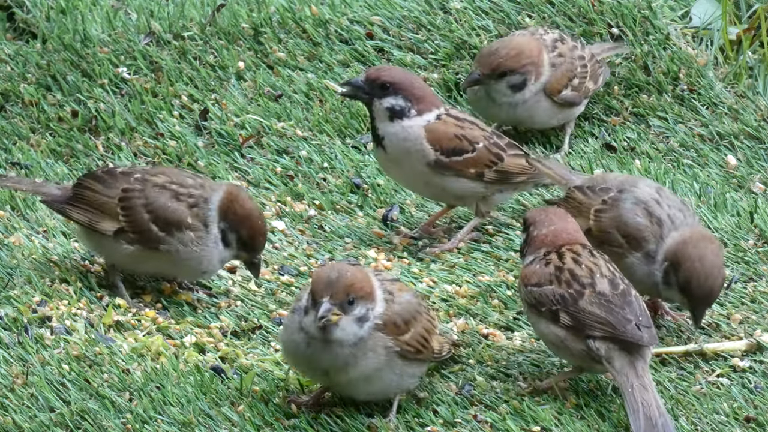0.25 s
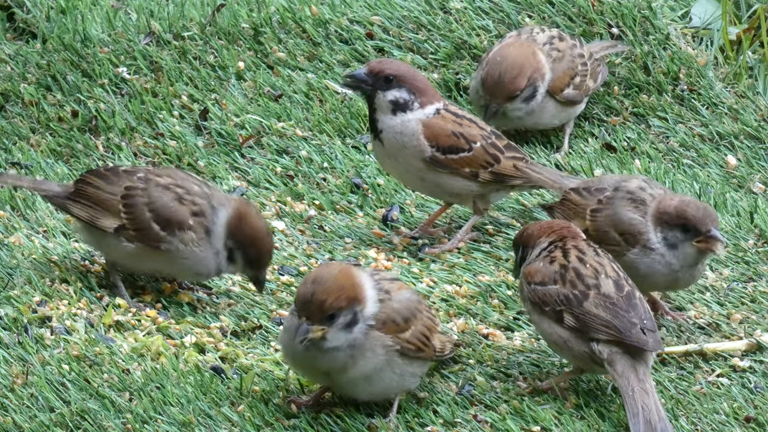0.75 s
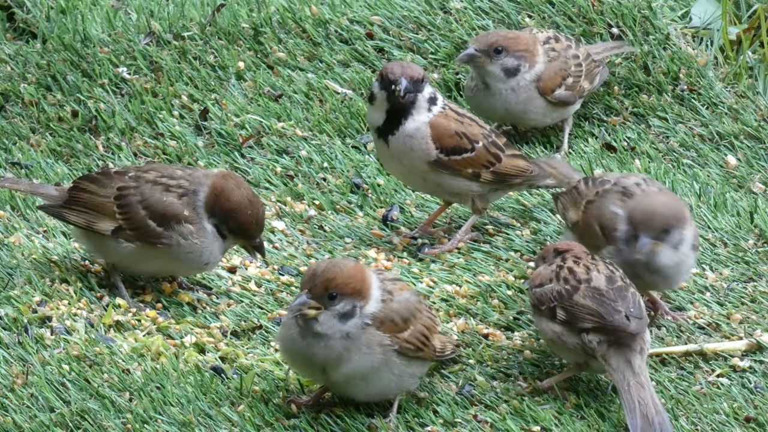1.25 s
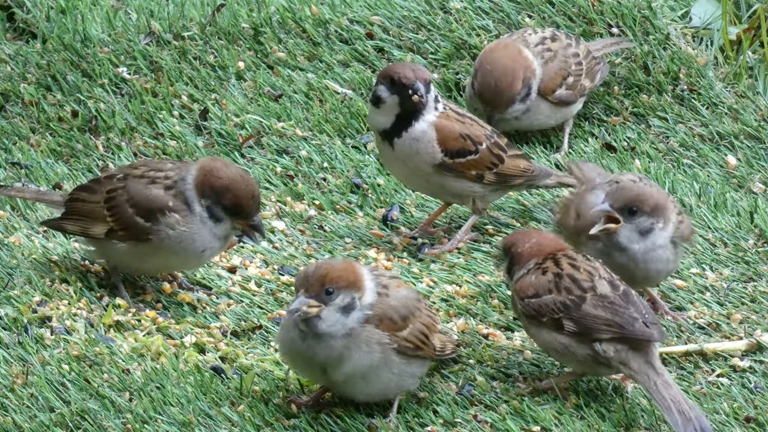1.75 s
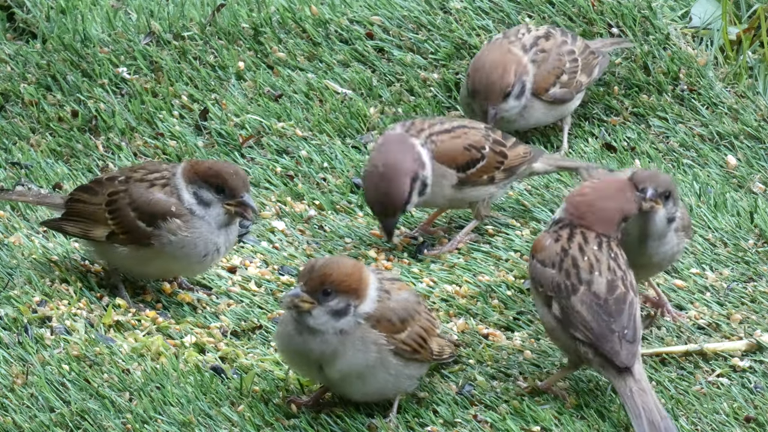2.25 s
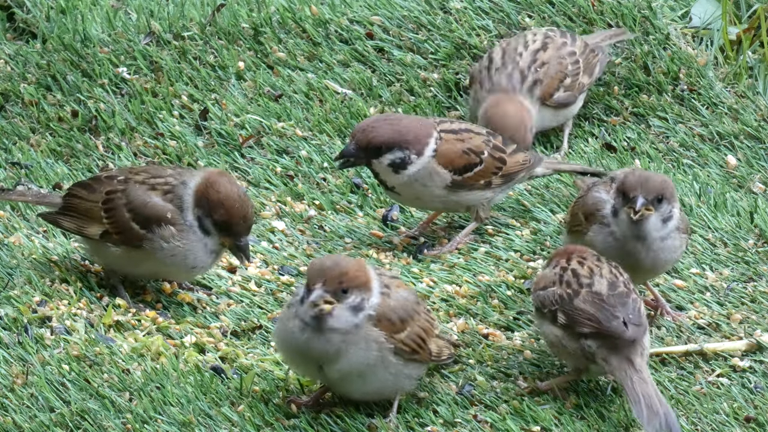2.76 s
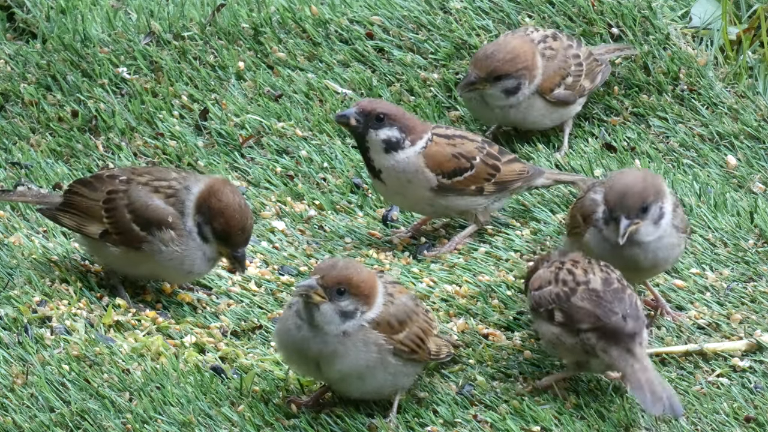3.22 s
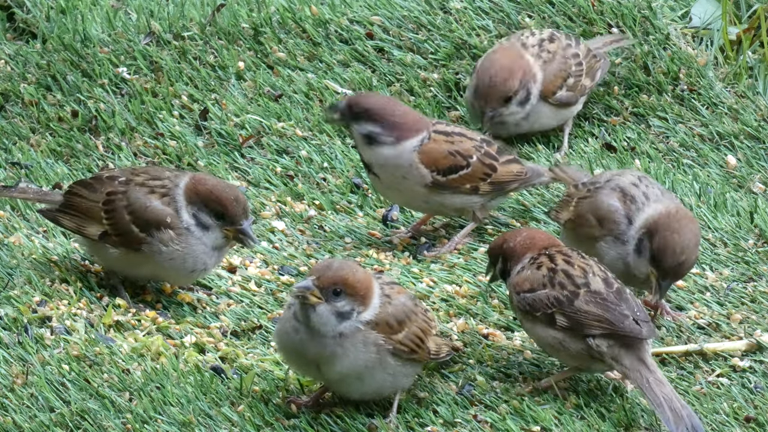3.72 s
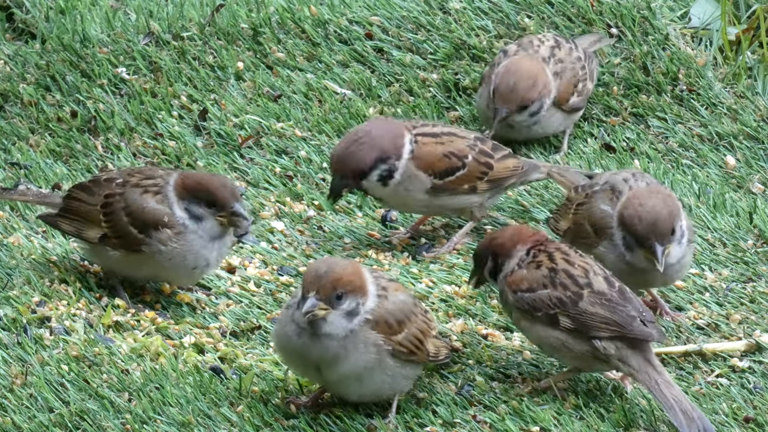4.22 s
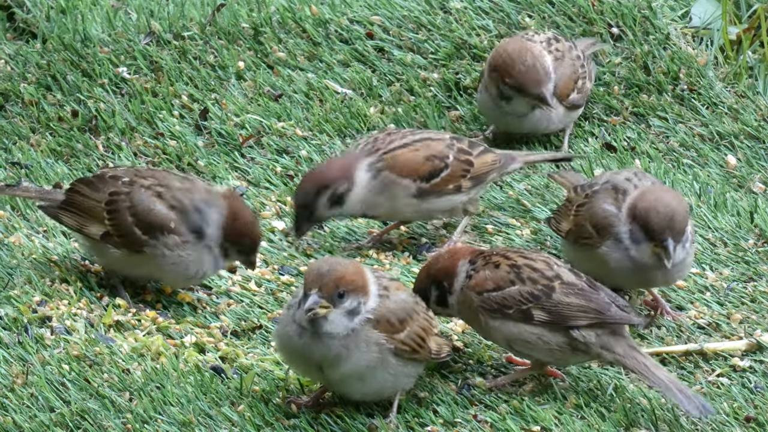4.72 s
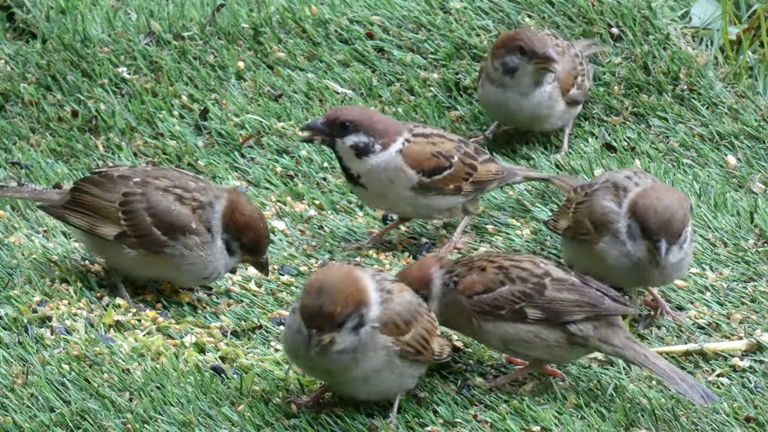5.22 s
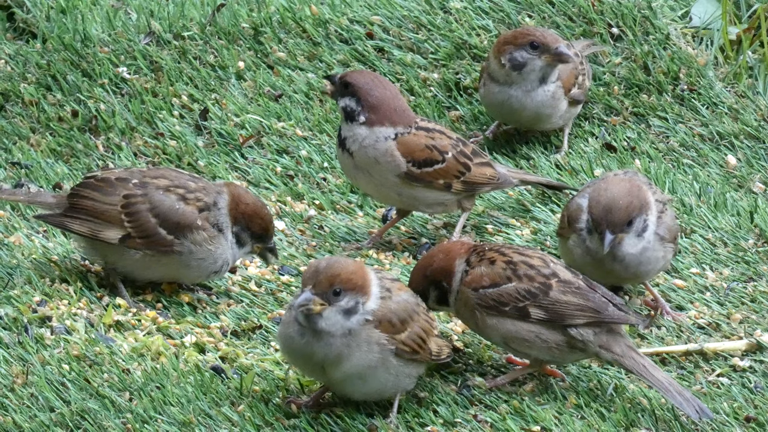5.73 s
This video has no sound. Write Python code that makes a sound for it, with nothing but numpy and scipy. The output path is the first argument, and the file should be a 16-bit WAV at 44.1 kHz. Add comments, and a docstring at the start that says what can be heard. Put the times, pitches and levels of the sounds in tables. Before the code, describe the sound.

Sparrows call close by on a lawn in a walled yard: falling two-toned chirps, bursts of raspy chatter in twos and threes, and single sharp chips, repeating in a loose cycle. Each call has a brief airy echo. A quiet low town rumble with a wavering hum lies beneath, in a stereo outdoor pickup.

```python
"""A town rumbles softly with a low hum; then sparrows on a lawn in a walled yard call over it.
Drawn-out chirps, harsh chatter and short clean chips are gliding tones of the two sides of the syrinx,
which mix and are filtered by throat and beak; thin wavering peeps come from further off.
Each call passes through decaying noise that stands for the scatter of ground and walls.
The rumble is filtered noise and the hum a sine of wandering pitch and level."""
import sys
import numpy as np
from scipy import signal
from scipy.fft import rfft, irfft
from scipy.io import wavfile

SR = 44100
rng = np.random.default_rng(int(sys.argv[2]) if len(sys.argv) > 2 else 0)


def put_to_file(sound):
    """Save the sound as 16-bit audio at rate SR, in the file named by the first command-line argument."""
    columns = np.atleast_2d(sound).T  # one column per channel
    safe = np.clip(columns, -1, 1)
    whole_steps = np.round(safe * 32767)
    wavfile.write(sys.argv[1], SR, whole_steps.astype(np.int16))


N = 263718  # samples

# Spectral density of the town rumble, relative: hz, density_db (per Hz)
TOWN_SPECTRUM = [(12, -42.5), (20, -3.5), (58, -4), (119, -5), (153, -11), (245, -14.5), (362, -19),
                 (581, -19.5), (932, -20), (1100, -23), (1630, -31), (2470, -34.5), (5090, -40),
                 (8880, -44), (15500, -45.5)]
# Likeness of the rumble at the two ears: hz, correlation (1 = identical)
EAR_LIKENESS = [(30, 0.46), (70, 0.73), (170, 0.48), (400, 0.24), (1500, 0.28), (8000, 0.038)]
TOWN_DB = -51
HUM_HZ, HUM_DB = 75.5, -57.5  # mean pitch, sine amplitude before its swelling

# Gestures of the syrinx, before each call's own stretch, pitch factors and levels: length_s;
# upper_arch and lower_arch, the pitch of each side: start_hz, top_hz, end_hz, rise_s, bow (exponent);
# upper_swell and lower_swell, the envelopes: level_db, attack_s, hold_s, grow_db_per_s, release_db_per_s;
# and, where present, trill: rate_hz, depth (share of pitch), centre_s, width_s;
# catch: depth_db, centre_s, width_s; strain: onset_db, fade_s, rest_db
CHIRP_GESTURE = dict( length_s=.084, upper_arch=dict(start_hz=3900, top_hz=5000, end_hz=2200, rise_s=.025, bow=1.5),
                 lower_arch=dict(start_hz=2900, top_hz=3650, end_hz=1350, rise_s=.025, bow=.75),
                 upper_swell=dict(level_db=-5, attack_s=.022, hold_s=.042, grow_db_per_s=130, release_db_per_s=1100),
                 lower_swell=dict(level_db=-4.5, attack_s=.021, hold_s=.007, grow_db_per_s=0, release_db_per_s=430),
                 trill=dict(rate_hz=122, depth=.07, centre_s=.021, width_s=.014),
                 catch=dict(depth_db=-8, centre_s=.035, width_s=.005),
                 strain=dict(onset_db=24, fade_s=.012, rest_db=0))
# The soft low note that trails every chirp: same fields
AFTERNOTE_GESTURE = dict( length_s=0.0306, upper_arch=dict(start_hz=2670, top_hz=2680, end_hz=2110, rise_s=0.0046, bow=0.94),
                     lower_arch=dict(start_hz=1700, top_hz=1685, end_hz=1220, rise_s=0.005, bow=.9),
                     upper_swell=dict(level_db=-17, attack_s=0.0039, hold_s=.003, grow_db_per_s=0, release_db_per_s=453),
                     lower_swell=dict(level_db=-24, attack_s=0.013, hold_s=0.004, grow_db_per_s=0, release_db_per_s=446))
CHATTER_GESTURE = dict( length_s=.044, upper_arch=dict(start_hz=3580, top_hz=4018, end_hz=2578, rise_s=0.01461, bow=1.6),
                   lower_arch=dict(start_hz=2624, top_hz=3263, end_hz=1158.3, rise_s=.007, bow=.62),
                   upper_swell=dict(level_db=-2.5, attack_s=0.011, hold_s=0.022, grow_db_per_s=-200, release_db_per_s=1606),
                   lower_swell=dict(level_db=-8, attack_s=0.0039, hold_s=0.019, grow_db_per_s=387, release_db_per_s=700),
                   strain=dict(onset_db=6.5, fade_s=0.013, rest_db=-2.5))
CHIP_GESTURE = dict( length_s=.051, upper_arch=dict(start_hz=1600, top_hz=4950, end_hz=2800, rise_s=.0125, bow=1.05),
                lower_arch=dict(start_hz=1400, top_hz=2250, end_hz=1550, rise_s=.015, bow=1.8),
                upper_swell=dict(level_db=0, attack_s=.018, hold_s=.02, grow_db_per_s=0, release_db_per_s=1100),
                lower_swell=dict(level_db=-26, attack_s=.02, hold_s=.024, grow_db_per_s=100, release_db_per_s=2500),
                trill=dict(rate_hz=90, depth=.13, centre_s=.026, width_s=.021),
                catch=dict(depth_db=-13, centre_s=.031, width_s=.0035),
                strain=dict(onset_db=17, fade_s=.008, rest_db=-5))

# Calls, levels before filtering and echo: start_s, level_db, stretch (time factor), upper_factor (pitch),
# lower_factor (pitch), roughness (0-1), overtones_db, lower_voice_db, scoop (share by which the pitch
# starts low), throat_hz (resonance), lift_db (of that resonance)
CHIRP_CALLS = [(.239, -27, 0.97, 0.97, 1.0, 0.31, -31, -3, .08, 4500, 1),
               (1.679, -29.5, .98, 0.98, 1.0, 0.37, -21.5, -1.5, 0.053, 5800, 8),
               (3.417, -28, 1.0, 0.96, 1.0, 0.24, -27, -3.5, 0.084, 4040, 1),
               (4.641, -28, 0.98, 0.93, 0.9, 0.38, -22, 2, 0.043, 5470, 9)]
CHATTER_CALLS = [(.476, -25, 1.286, .94, 1.24, 0.62, -6, -1.6, .3, 3750, 1),
                 (.596, -29.5, 1.05, 1.02, .92, 0.49, -2.5, -0.19, 0.0034, 7100, 12.8),
                 (1.353, -28.5, 1.02, 0.98, 1.01, 0.76, -3.5, -1.5, 0.0046, 3370, 2.1),
                 (1.467, -31, 0.96, 0.94, 0.81, 0.5, -2, 0.46, .05, 3640, 4.9),
                 (1.936, -29, 0.91, 1.08, 1.12, 0.58, -1, -0.12, 0, 4900, 6),
                 (2.073, -27, .88, 1.21, 1.16, 0.59, -2, -2.9, .25, 3860, 5.4),
                 (3.626, -28.5, 1.31, 1.03, 1.085, 0.75, -5.5, -1.2, .25, 3700, 2.7),
                 (3.732, -27.5, 1.14, 0.89, 1.08, 0.61, 2, -0.098, 0, 5350, 5),
                 (3.84, -26.5, 0.96, .97, 1.06, 0.643, 0.5, -0.2, 0.03, 6000, 3.2),
                 (4.043, -46, .78, 1.05, 0.97, 1, -16, 0.79, 0.14, 2380, 2.6),
                 (4.815, -28, 1.06, .89, 0.97, 0.86, -5, 0.19, 0, 6640, 1.8),
                 (4.929, -27.5, 1.06, .9, 0.87, 0.37, -3, 0.21, .15, 5500, 3.8)]
CHIP_CALLS = [(1.057, -24, 1, 0.96, 0.98, 0.27, -19.5, 0, 0.0025, 4600, 1.8),
              (2.498, -25, 0.96, 0.94, 0.98, 0.28, -16.5, 0, 0.0031, 4450, 2.7),
              (4.1347, -25, 0.97, 0.96, 0.97, 0.31, -25.5, 0, 0, 4370, 2.8),
              (5.309, -26.5, 0.99, 0.95, 1.0, 0.37, -19, 0.0051, 0, 5300, 3.5)]
# Thin distant peeps, before echo: start_s, level_db, length_s, pitch_hz (mean)
PEEP_CALLS = [(0.898, -69, 0.09, 5080), (4.438, -63.5, 0.047, 5680), (4.545, -59, 0.017, 5720)]

# Fixed colour of beak and throat: hz, gain_db
BEAK_COLOUR = [(600, -15.5), (1200, -9.5), (2000, -3), (3500, 0), (5000, -0.5), (6500, -4), (8300, -9.5),
               (10500, -9), (13000, -16), (16000, -49)]
# Colour of the lingering yard echo: hz, gain_db
YARD_COLOUR = [(1000, -5), (2200, 0.5), (3500, 0), (4800, -0.5), (7000, 1.5), (12000, -1)]
# Left-right difference of the quick scatter, relative to its shared part: hz, gain_db
SCATTER_SPREAD = [(1500, -9.5), (4000, -5), (8000, 2), (13000, 5.5)]

AFTERNOTE_DELAY_S = .097  # before the chirp's stretch
ONSET_DB = -25  # a voice starts this far below its level
BREAK_UP_S = 0.01118  # a call starts clean and takes this long to turn rough
SCOOP_S = .008  # time scale on which a scooped call slides up to its pitch
THROAT_Q = 8
CUTOFF_HZ = 15760

# Places: pan_db is left over right; near is the quick scatter, far the lingering echo before its colour
LAWN = dict(pan_db=-0.9, near_db=-8.0, near_t60=0.12, far_db=-11.0, far_t60=0.54)  # t60 in s
BY_WALL = dict(pan_db=1.7, near_db=-6.0, near_t60=0.098, far_db=-15.0, far_t60=0.51)
FAR_OFF = dict(pan_db=0, near_db=-9, near_t60=0.093, far_db=-0.5, far_t60=0.83)


def from_db(db):
    """Amplitude ratio of a level: twenty decibels are a factor of ten."""
    return 10 ** (np.asarray(db) / 20)


def rms_one(x):
    """Normalisation to unit root-mean-square."""
    return x / np.sqrt(np.mean(x ** 2) + 1e-20)


def at_hz(points, hz):
    """Interpolation of a table along a log-frequency axis."""
    table = np.array(points)
    return np.interp(np.log(hz + 1e-9), np.log(table[:, 0]), table[:, 1])


def colour(x, spectrum):
    """Linear filtering: each spectral component is scaled by a smooth gain curve in dB."""
    size = x.shape[-1]
    gain = from_db(at_hz(spectrum, np.fft.rfftfreq(size, 1 / SR)))
    return irfft(rfft(x) * gain, size)


def wander(size, rate_hz):
    """Random modulation: noise through a two-pole low-pass varies on the scale of rate_hz, with spread 1."""
    pole = np.exp(-2 * np.pi * rate_hz / SR)
    noise = rng.standard_normal(size + SR // 10)  # the extra lead-in lets the filter settle
    return rms_one(signal.lfilter([1], [1, -2 * pole, pole * pole], noise))[-size:]


def phase_of(hz):
    """Phase is the running integral of frequency."""
    return 2 * np.pi * np.cumsum(hz) / SR


def add(track, start_s, sound):
    """Superposition: sounds sum linearly, here from start_s on."""
    start = int(start_s * SR)
    track[:, start:start + sound.shape[-1]] += sound[..., :N - start]


def town():
    """Partial coherence: shared and opposed noise set the likeness of the ears; a hum swells and sinks."""
    alike = np.clip(at_hz(EAR_LIKENESS, np.fft.rfftfreq(N, 1 / SR)), -1, 1)
    mid, side = rfft(rng.standard_normal((2, N)))
    air = irfft(np.sqrt(1 + alike) * mid + np.sqrt(1 - alike) * side * [[1], [-1]], N)
    rumble = from_db(TOWN_DB) * rms_one(colour(air, TOWN_SPECTRUM))
    hum_hz = HUM_HZ * (1 + .018 * wander(N, 3))
    hum = np.sin(phase_of(hum_hz)) * (1 + 0.69 * wander(N, 3.0))
    return (rumble + from_db(HUM_DB) * hum) * from_db([[-.6], [.6]])  # slightly stronger on the right


def arch(t, length_s, start_hz, top_hz, end_hz, rise_s, bow):
    """Pitch gesture: a smooth move to the top, then on to the end; a bow above 1 delays the fall."""
    climb = np.sin(np.pi / 2 * np.clip(t / rise_s, 0, 1)) ** 2
    fall = np.clip((t - rise_s) / (length_s - rise_s), 0, 1) ** bow
    return start_hz + (top_hz - start_hz) * climb + (end_hz - top_hz) * fall


def swell(t, level_db, attack_s, hold_s, grow_db_per_s, release_db_per_s):
    """Exponential envelope, straight in dB: attack, a hold that may grow or sink, release."""
    attack = ONSET_DB * np.clip(1 - t / attack_s, 0, 1)
    hold = grow_db_per_s * np.clip(t - attack_s, 0, hold_s)
    release = release_db_per_s * np.maximum(t - attack_s - hold_s, 0)
    return level_db + attack + hold - release


def bump(t, centre_s, width_s):
    """Gaussian bell of height 1."""
    return np.exp(-((t - centre_s) / width_s) ** 2)


def trill(t, rate_hz, depth, centre_s, width_s):
    """Frequency modulation: a few quick swings of the pitch factor, widest at the centre."""
    return 1 + depth * bump(t, centre_s, width_s) * np.cos(2 * np.pi * rate_hz * (t - centre_s))


def catch(t, depth_db, centre_s, width_s):
    """Amplitude modulation: a brief dip in dB, as of a choked voice."""
    return depth_db * bump(t, centre_s, width_s)


def strain(t, onset_db, fade_s, rest_db):
    """Nonlinearity grows with strain: overtones and mixing tones, in dB, start high, then relax."""
    return rest_db + onset_db * bump(t, 0, fade_s)


def controls(t, gesture):
    """Motor control: pitch and level of both voices, and their strain, through one call."""
    swing = trill(t, **gesture["trill"]) if "trill" in gesture else 1
    dip_db = catch(t, **gesture["catch"]) if "catch" in gesture else 0
    strain_db = strain(t, **gesture["strain"]) if "strain" in gesture else 0
    upper_hz = swing * arch(t, gesture["length_s"], **gesture["upper_arch"])
    lower_hz = swing * arch(t, gesture["length_s"], **gesture["lower_arch"])
    upper_db = swell(t, **gesture["upper_swell"]) + dip_db
    lower_db = swell(t, **gesture["lower_swell"])
    return upper_hz, lower_hz, upper_db, lower_db, strain_db


def syrinx(gesture, call, flutter_hz, flutter, jitter, jitter_hz, shimmer_db, mixing_db,
           upper_octave_db, third_db, sum_db, hiss_db, rasp=0):
    """Coupled oscillators: two gliding tones, their overtones and combination tones, and a hiss of air."""
    _, level_db, stretch, upper_factor, lower_factor, roughness, overtones_db, lower_voice_db, scoop = call
    t = np.arange(int(gesture["length_s"] * stretch * SR)) / SR
    upper_hz, lower_hz, upper_db, lower_db, strain_db = controls(t / stretch, gesture)
    rough = roughness * np.clip(t / BREAK_UP_S, 0, 1)
    quiver = 1 + flutter * np.sin(2 * np.pi * (flutter_hz * t + rng.random()))
    glide = quiver * (1 - scoop * bump(t, 0, SCOOP_S))

    def stray():
        # each membrane strays from its pitch on its own, more so in a harsh call
        return 1 + jitter * rough * wander(len(t), jitter_hz)

    up = phase_of(upper_hz * upper_factor * glide * stray())
    low = phase_of(lower_hz * lower_factor * glide * stray())
    upper = from_db(upper_db + shimmer_db * wander(len(t), 269))
    lower = from_db(lower_db + lower_voice_db + shimmer_db * wander(len(t), 269))
    # rasp: the lower membrane shakes the upper tone at half its own pitch, which makes side bands
    shake = 1 + rasp * rough * np.sin(low / 2)
    tones = upper * np.sin(up) * shake + lower * np.sin(low)
    octaves = from_db(upper_octave_db) * upper * np.sin(2 * up) + lower * np.sin(2 * low)
    thirds = upper * np.sin(3 * up) + lower * np.sin(3 * low)
    # both sides share one air stream, so each modulates the other
    shared = upper * lower / (upper + lower)
    mixing = from_db(mixing_db) * shared * (np.sin(2 * up - low) + .5 * np.sin(2 * low - up))
    overtones = octaves + from_db(third_db) * thirds + from_db(sum_db) * shared * np.sin(up + low)
    # air escapes in puffs, one for each swing of the lower membrane
    puffs = (upper + lower) * (1 + np.sin(low))
    hiss = from_db(overtones_db + hiss_db) * puffs * rng.standard_normal(len(t))
    voice = tones + from_db(strain_db) * (mixing + from_db(overtones_db) * overtones) + hiss
    return from_db(level_db) * voice * signal.windows.tukey(len(t), .12)


def throat(x, hz, lift_db):
    """Resonance: the bird tunes its throat anew for each call, which lifts one band."""
    band = signal.lfilter(*signal.iirpeak(hz, THROAT_Q, fs=SR), x)
    return x + (from_db(lift_db) - 1) * band


def echoes(t60, delay_s, spread, size):
    """Diffuse decay: dense noise for each ear, dying 60 dB per t60; the shared part has unit energy."""
    t = np.arange(size) / SR
    mid, side = rng.standard_normal((2, size))
    build_up = np.clip(t / delay_s - 1, 0, 1)  # silent up to delay_s, full at twice that
    decay = rms_one(from_db(-60 * t / t60) * build_up) / np.sqrt(size)
    return decay * (mid + colour(side, spread) * [[1], [-1]])


def yard(x, pan_db, near_db, near_t60, far_db, far_t60):
    """Impulse response: direct path, quick scatter from ground and nearest wall, longer echo of the yard."""
    far = echoes(far_t60, 0.0068, [(1000, -5)], size=SR // 2)  # side part 5 dB down at every pitch
    response = from_db(far_db) * colour(far, YARD_COLOUR)
    near = from_db(near_db) * echoes(near_t60, 0.0014, SCATTER_SPREAD, size=SR // 10)
    near[:, 0] = 1  # the direct path
    add(response, 0, near * from_db([[pan_db / 2], [-pan_db / 2]]))
    return signal.fftconvolve(x[None], response, axes=1)


def bird(gesture, calls, place, **voice):
    """Source and filter: syrinx, throat, beak; the bird turns, so each call scatters differently."""
    out = np.zeros((2, N))
    for *call, throat_hz, lift_db in calls:
        sound = np.pad(syrinx(gesture, call, **voice), (0, SR // 100))  # room for the resonance to ring
        coloured = colour(throat(sound, throat_hz, lift_db), BEAK_COLOUR)
        add(out, call[0], yard(coloured, **place))
    return out


def chirps():
    """Two-voice glides with a trill and a catch, each trailed by a soft low note of the same voice."""
    voice = dict(flutter_hz=168.6, flutter=0.025, jitter=0.16, jitter_hz=810, shimmer_db=2.5,
                 mixing_db=-12, upper_octave_db=1, third_db=-12, sum_db=13.5, hiss_db=-1.5)
    afternotes = [(start_s + AFTERNOTE_DELAY_S * stretch, level_db, stretch, *rest)
                  for start_s, level_db, stretch, *rest in CHIRP_CALLS]
    main = bird(CHIRP_GESTURE, CHIRP_CALLS, LAWN, **voice)
    return main + bird(AFTERNOTE_GESTURE, afternotes, LAWN, **voice)


def chatter():
    """Subharmonic modulation and strong jitter spread the tones into harsh bands."""
    return bird(CHATTER_GESTURE, CHATTER_CALLS, BY_WALL, flutter_hz=169.7, flutter=0.066,
                jitter=0.1543, jitter_hz=568, shimmer_db=2.5, mixing_db=-31, upper_octave_db=-20.0,
                third_db=-8, sum_db=-1.5, hiss_db=-13.5, rasp=0.6)


def peeps(waver=0.082):
    """Frequency modulation by noise makes faint wavering whistles; the strong echo sets them far off."""
    out = np.zeros((2, N))
    for start_s, level_db, length_s, pitch_hz in PEEP_CALLS:
        size = int(length_s * SR)
        phase = phase_of(pitch_hz * (1 + waver * wander(size, 410)))
        whistle = from_db(level_db) * np.hanning(size) * np.sin(phase)
        add(out, start_s, yard(whistle, **FAR_OFF))
    return out


def chips():
    """A short arch of the upper voice over a weaker lower one, with strong combination tones."""
    return bird(CHIP_GESTURE, CHIP_CALLS, LAWN, flutter_hz=165.6, flutter=0.032,
                jitter=0.158, jitter_hz=726, shimmer_db=3.0, mixing_db=11.5, upper_octave_db=5.5,
                third_db=2, sum_db=12, hiss_db=-17)


def scene():
    """Superposition: chirps and chips just right of centre, chatter from the left, nearer a wall."""
    return town() + chirps() + chatter() + peeps() + chips()


def record(dry):
    """Low-pass filtering without phase shift: the top is cut steeply."""
    low_pass = signal.ellip(10, .05, 60, CUTOFF_HZ, fs=SR, output="sos")
    return signal.sosfiltfilt(low_pass, dry)


dry = scene()
out = record(dry)
put_to_file(out)
```